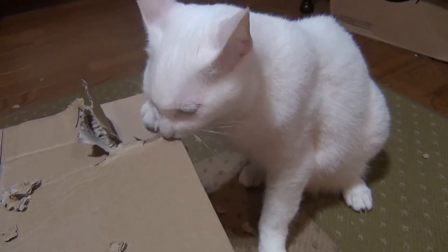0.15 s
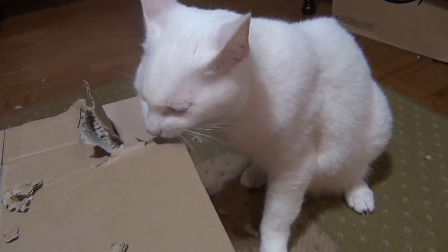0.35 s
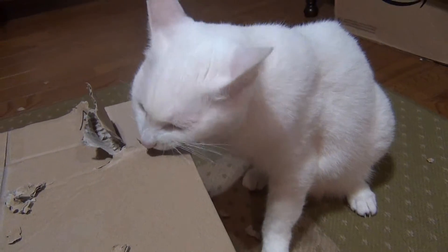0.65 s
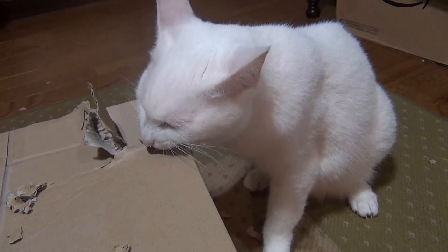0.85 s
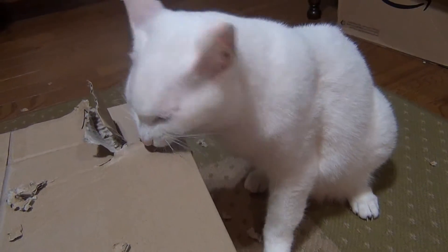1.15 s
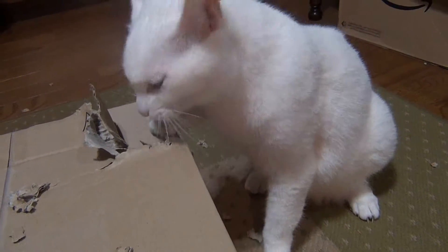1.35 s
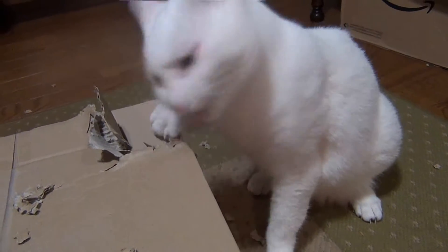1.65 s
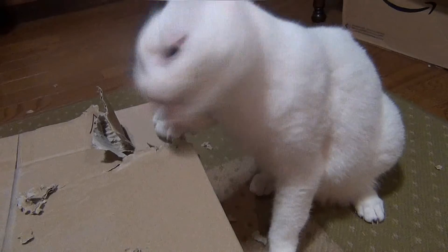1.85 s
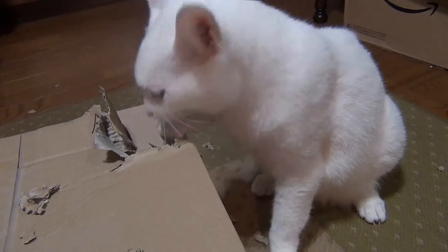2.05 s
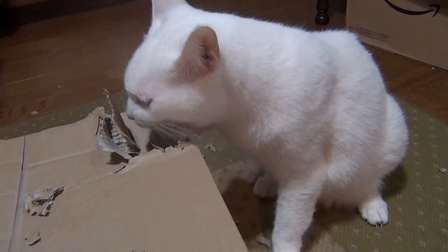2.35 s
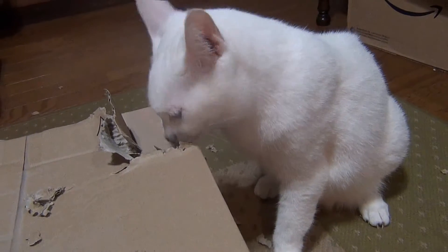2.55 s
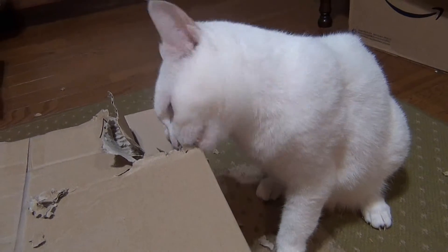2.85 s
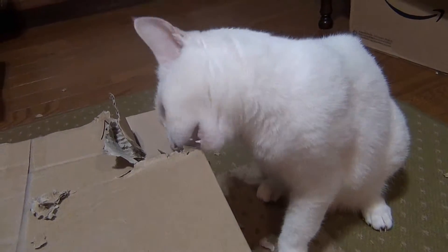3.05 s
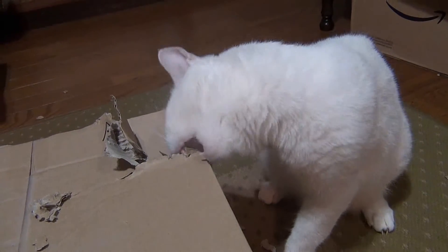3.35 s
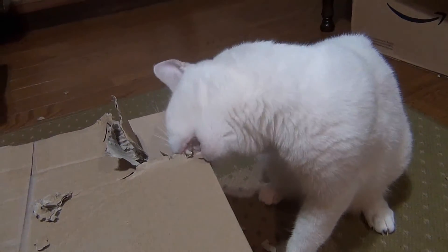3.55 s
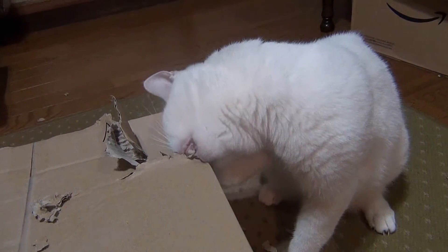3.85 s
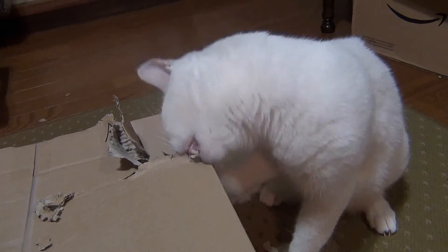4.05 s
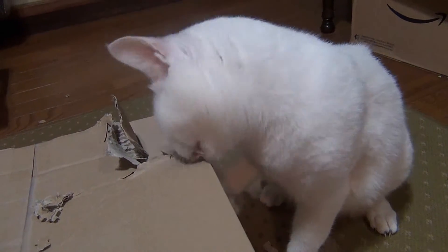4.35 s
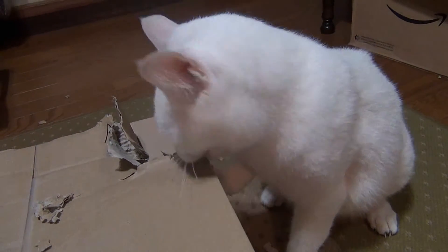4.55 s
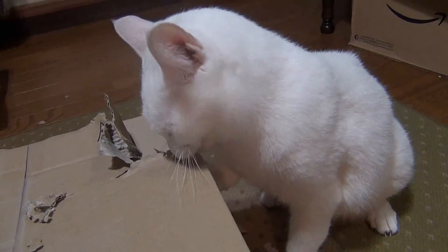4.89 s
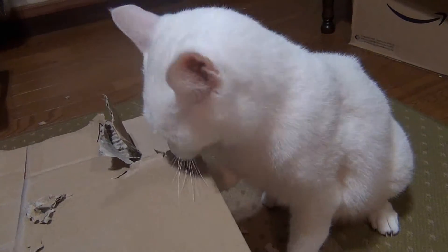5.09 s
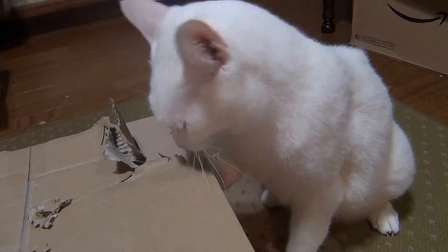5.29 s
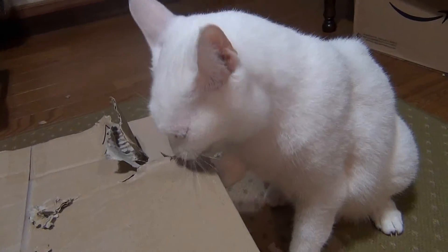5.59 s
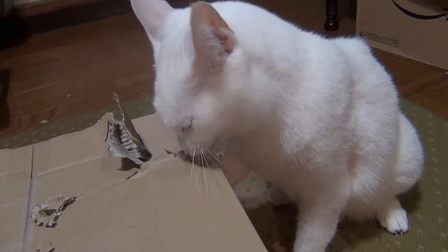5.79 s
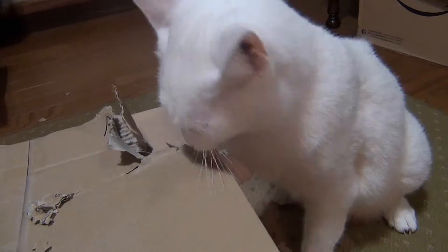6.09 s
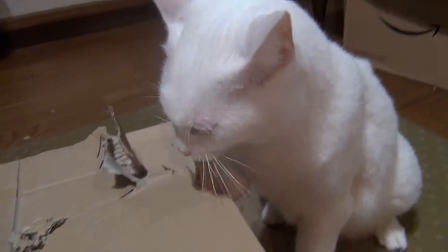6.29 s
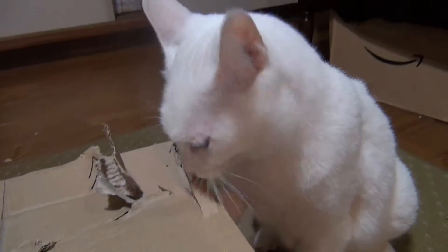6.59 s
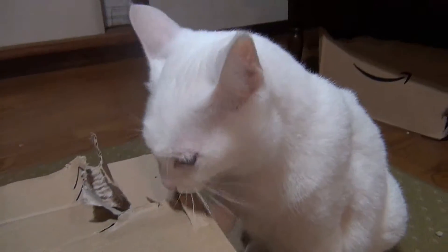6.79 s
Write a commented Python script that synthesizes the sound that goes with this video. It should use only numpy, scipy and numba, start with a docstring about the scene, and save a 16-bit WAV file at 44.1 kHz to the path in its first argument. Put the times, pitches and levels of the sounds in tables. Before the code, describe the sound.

Quiet room air and faint wet-gritty nibbling, then teeth bite into stiff cardboard: sharp pops, a hard tearing burst and a low box knock. Near silence with tiny rubs follows. A longer bout of dry crackling and snapping ends in a loud rip; isolated clicks, then one last abrupt tear. Close stereo pickup, short indoor reverberation.

```python
"""Faint room air, then soft gritty rubs: a cat chews, close by, at the edge of a corrugated cardboard box.
Its bites crackle and snap: random tiny fractures excite resonances of the panels, the sheet and the fibres.
At hard tugs torn flaps ring as decaying sines, and jolts set the modes of box and room ringing.
Rubs are noise bursts through mouth resonances; echoes, a decaying-noise tail and two microphones complete it."""
import sys
import numpy as np
from scipy import signal
from scipy.fft import rfft, irfft
from scipy.io import wavfile
from scipy.ndimage import uniform_filter1d
from numba import njit

SR = 44100
rng = np.random.default_rng(int(sys.argv[2]) if len(sys.argv) > 2 else 0)


def wav_out(sig):
    """Save sig, one row per channel (or a flat mono array), as 16-bit PCM at SR to the path in sys.argv[1]."""
    wavfile.write(sys.argv[1], SR, np.round(np.clip(np.atleast_2d(sig).T, -1, 1) * 32767).astype(np.int16))


N = 305613
T = np.arange(N) / SR   # time in s


def from_db(db):
    """Logarithmic level: every 20 dB is a factor of ten in amplitude."""
    return 10 ** (np.asarray(db) / 20)


def rms_one(x):
    """Normalization: the root of the mean square becomes 1."""
    return x / np.sqrt(np.mean(x ** 2) + 1e-20)


def resonate(x, hz, width_hz):
    """Linear resonance: a pole pair passes its centre pitch with gain 1; its radius sets the bandwidth."""
    r = np.exp(-np.pi * width_hz / SR)
    numerator = np.array([1, 0, -1]) * (1 - r * r) / 2
    denominator = [1, -2 * r * np.cos(2 * np.pi * hz / SR), r * r]
    return signal.lfilter(numerator, denominator, x + 1e-18)


@njit
def glide(x, hz, width_hz, rate):
    """Time-varying resonance: the pole angle follows a moving centre pitch at constant bandwidth."""
    r = np.exp(-np.pi * width_hz / rate)
    y = np.zeros(len(x))
    for i in range(2, len(x)):
        drive = (1 - r * r) / 2 * (x[i] - x[i - 2])
        feedback = 2 * r * np.cos(2 * np.pi * hz[i] / rate) * y[i - 1] - r * r * y[i - 2]
        y[i] = drive + feedback + 1e-18
    return y


def width_of(t60):
    """Damping and bandwidth: a mode that falls 60 dB in t60 seconds has this width in Hz."""
    return np.log(1000) / np.pi / t60


def favour(modes, favoured_hz, db_per_octave):
    """Selective excitation: modes answer less the more octaves they lie from the favoured pitch."""
    return [(hz, from_db(db - db_per_octave * abs(np.log2(hz / favoured_hz)))) for hz, db in modes]


def add(power, at, db, rise, fall):
    """Exponential swell: power climbs 20 dB over the rise and sinks 20 dB over the fall."""
    near = slice(*np.searchsorted(T, [at - 4 * rise, at + 4 * fall]))
    distance = np.maximum((at - T[near]) / rise, (T[near] - at) / fall)
    power[near] += from_db(db - 20 * distance) ** 2


# spectrum of the room air: pitch_hz, relative_level_db (per Hz)
AIR_SPECTRUM = [(25, -23), (60, -22.5), (90, -17), (125, 4), (170, -8), (330, -12.5), (600, -9.5),
                (900, -8.5), (1080, -21.5), (1300, -15), (1900, -25), (4000, -28), (10500, -30)]
AIR_DB = -67   # rms of the part common to both sides


def background(side_db=-7.5):
    """Stationary noise: random air sound shaped in spectrum, partly opposite in phase at the two sides."""
    hz, db = np.transpose(AIR_SPECTRUM)
    log_hz = np.log(np.fft.rfftfreq(N, 1 / SR) + 1)
    colour = from_db(np.interp(log_hz, np.log(hz), db))
    mid, side = rms_one(irfft(rfft(rng.standard_normal((2, N))) * colour, N))
    return from_db(AIR_DB) * (mid + from_db(side_db) * side * np.array([[1], [-1]]))


# resonances of a scrap of card in the open mouth: pitch_hz, level_db
MOUTH_MODES = [(290, 1.5), (690, 3), (990, 0.5), (1350, 1.5), (2380, 2), (2870, -6.5), (3600, -6)]
MOUTH_FOCUS_DB_PER_OCTAVE = 13.5
# teeth and tongue rub the card or a scrap in the mouth: start_s, level_db, length_s, favoured_pitch_hz
NIBBLES = [(0.289, -63.5, 0.098, 1340), (0.445, -56.5, 0.044, 1870), (0.463, -51.5, 0.033, 1120),
           (0.579, -67, 0.028, 1860), (0.615, -62, 0.0196, 1770), (.741, -53.5, .012, 1250),
           (0.754, -54, 0.019, 1390), (0.964, -45.5, 0.014, 1760), (1.019, -37.5, 0.011, 2000),
           (1.208, -41, 0.019, 1780), (1.255, -40.5, 0.022, 1370), (1.443, -45, .013, 2860),
           (1.709, -58, 0.006, 2454), (1.841, -49, .032, 396), (1.95, -52.5, 0.035, 330),
           (2.026, -55, 0.022, 750), (2.073, -52.5, .021, 417), (2.172, -64.5, .055, 705),
           (2.59, -64, 0.014, 1200), (2.839, -65, 0.019, 1096), (3.403, -56, 0.047, 800),
           (3.496, -46.5, 0.025, 1836), (4.124, -48.5, 0.053, 1140), (5.861, -57.5, 0.015, 850),
           (6.241, -31, 0.054, 3640)]


def nibbles():
    """Source and filter: short gritty friction is coloured by the resonances of card and open mouth."""
    out, age = np.zeros(N + SR), T[:SR // 4]
    grits = rng.standard_normal((len(NIBBLES), len(age)))
    for (s, db, length, favoured_hz), grit in zip(NIBBLES, grits):
        rise = length / 4
        force = grit * np.abs(grit) * age / rise * np.exp(-age / rise)
        modes = favour(MOUTH_MODES, favoured_hz, MOUTH_FOCUS_DB_PER_OCTAVE)
        rub = sum((-1) ** k * gain * resonate(force, hz, 35 + .06 * hz)
                  for k, (hz, gain) in enumerate(modes))
        loudness = np.sqrt(np.sum(rub ** 2) / (2 * rise * SR))
        i = round((s - rise / 2) * SR)
        out[i:i + len(age)] += from_db(db) * rub / loudness
    return out[:N]


# box panels: pitch_hz, level_db, t60_s (free ringing)
BOX_MODES = [(52.38, -8.5, .14), (95.62, -8, 0.12), (151.3, -10.5, 0.1), (222, -4, 0.18),
             (295.6, -6.5, 0.19), (371.6, -10.5, .07), (539, -10, 0.1)]
# standing waves between floor and ceiling: pitch_hz, level_db (after a jolt), t60_s
ROOM_MODES = [(58.96, -28.5, 1.6), (136, -30, 0.92), (176, -24, .63), (237, -15, 0.47), (303, -21, 0.43),
              (350, -22, 0.33), (412, -39.5, 0.2), (590, -36, 0.13)]
# the whole box jolts: start_s, level_db, rocking_db (extra below 100 Hz as it rocks on the floor)
THUMPS = [(0.755, -54, 1), (1.087, -27, -2.5), (1.399, -11.5, 1.5), (3.293, -54.5, 14.5),
          (3.903, -41.5, -1.5), (4.33, -35.5, -4), (4.545, -53, 8.5), (5.255, -26, -1.5),
          (5.723, -48.5, -1.5), (6.259, -23, -2.5)]


def thumps(modes):
    """Modal superposition: each jolt starts a sum of exponentially decaying sines."""
    out, age = np.zeros(N + 2 * SR), T[:2 * SR]
    rings = np.array([(-1) ** k * from_db(db - 60 * age / t60) * np.sin(2 * np.pi * hz * age)
                      for k, (hz, db, t60) in enumerate(modes)])
    deep = np.array(modes)[:, 0] < 100
    for s, db, rock_db in THUMPS:
        i = round(s * SR)
        out[i:i + len(age)] += from_db(db + rock_db * deep) @ rings
    return out[:N]


# the jaw holds the card and it crackles steadily: start_s, end_s, sheet_level_db, fibre_share_db
GRIPS = [(0.992, 1.134, -54.5, -4.5), (1.194, 1.415, -60.5, 6), (1.502, 2.097, -69, -13.5),
         (2.85, 3.4, -77, -3), (3.421, 3.8, -64.5, -5), (3.85, 4.614, -58.5, -1), (4.66, 5.246, -63, 1.5),
         (5.4, 6.93, -73, 0)]
GRIP_ATTACK_DB_PER_S, GRIP_RELEASE_DB_PER_S, GRIP_BOX_DB = 298.5, 151, 2.5


def grip():
    """Sustained forcing: crackle power in sheet and fibres as the jaw closes, holds and lets go."""
    sheet, fibre = 0, 0
    for start, end, db, fibre_db in GRIPS:
        closing_db = (start - T) * GRIP_ATTACK_DB_PER_S
        opening_db = (T - end) * GRIP_RELEASE_DB_PER_S
        slack_db = np.clip(np.maximum(closing_db, opening_db), 0, 80)
        held = from_db(db - slack_db) ** 2
        sheet, fibre = sheet + held, fibre + held * from_db(fibre_db) ** 2
    return sheet, fibre


def fractures(per_s, spread_db, clump_db):
    """Random point process: tiny breaks of uneven size bunch over milliseconds, their local power evened."""
    sizes = from_db(spread_db * np.minimum(rng.exponential(1, N), 4)) * rng.choice([-1, 1], N)
    clicks = sizes * (rng.random(N) < per_s / SR)
    clumps = rms_one(uniform_filter1d(rng.standard_normal(N), size=130))
    clicks = clicks * from_db(clump_db * clumps)
    local_power = np.abs(uniform_filter1d(clicks ** 2, size=1500))
    return clicks / np.sqrt(local_power + 1e-6)


# tugs that tear or crush the card: start_s (at the height), sheet_level_db, fall_s, fibre_share_db, box_share_db
TUGS = [(1.028, -48, 0.035, 8, -6), (1.0858, -24, 0.0068, -3.5, -12.5), (1.242, -38.5, 0.041, 8, -6),
        (1.285, -51, 0.054, 5, -15), (1.376, -24, 0.028, 0, 5), (1.391, -28.5, 0.031, -10, 9.5),
        (3.295, -46.5, 0.028, -7, -14), (3.512, -43.5, 0.035, -1.5, -7.5), (3.777, -51, 0.014, 3, 10.5),
        (3.82, -49.5, 0.074, -7.5, 3.5), (3.904, -32.5, .018, 3.5, 1.5), (3.944, -40.5, 0.067, -11, 3.5),
        (3.989, -47, 0.05, 11, -17), (4.031, -38, 0.024, 2.5, -4.5), (4.242, -45.5, 0.017, 2, 2),
        (4.339, -46.5, 0.036, 7.5, 1.5), (4.426, -42, 0.086, 5.5, -20), (4.529, -42, 0.011, 5, 6),
        (4.895, -39.5, 0.03, 4.5, -33), (4.964, -40, 0.0096, -0.5, -16), (5.235, -24.5, 0.034, 2, -1),
        (5.256, -30.5, 0.037, -21, -3), (6.242, -19, .03, 2.5, -8.5), (6.263, -29, 0.033, 2.5, -2)]
# in fall times: a tug builds faster than it lets go, and the fibres part first
TUG_RISE_SHARE, FIBRE_LEAD_SHARE = 0.8, .08
# in fall times: the heavy box follows late and settles slowly
BOX_LAG_SHARE, BOX_STRETCH = 0.25, 2
# the card strains faintly before a tug and settles after it; stretches in fall times
STRAIN_DB, STRAIN_STRETCH, SETTLE_STRETCH = -23.5, 3.2, 2.0
# each rub also stirs the fibres and the box; stretch in rub lengths
NIBBLE_FIBRE_DB, NIBBLE_BOX_DB, NIBBLE_STRETCH = -14.5, -12, 2


def tearing(sliding_db=-10.0):
    """Fracture under load: breaking fibres drive the box, the sheet and the fibres around them."""
    sheet, fibre = grip()
    box = sheet * from_db(GRIP_BOX_DB) ** 2
    for at, db, fall, fibre_db, box_db in TUGS:
        rise = TUG_RISE_SHARE * fall
        add(box, at + BOX_LAG_SHARE * fall, db + box_db, rise, BOX_STRETCH * fall)
        fibre_at = at - FIBRE_LEAD_SHARE * fall
        for part, height, level_db in ((sheet, at, db), (fibre, fibre_at, db + fibre_db)):
            add(part, height, level_db, rise, fall)
            add(part, height, level_db + STRAIN_DB, STRAIN_STRETCH * fall, SETTLE_STRETCH * fall)
    for at, db, length, _ in NIBBLES:
        for part, share_db in ((box, NIBBLE_BOX_DB), (fibre, NIBBLE_FIBRE_DB)):
            add(part, at, db + share_db, length, NIBBLE_STRETCH * length)
    # a gentle pull breaks fibres one by one, a hard rip breaks them in a rush
    per_s = 900 + 24000 * np.sqrt(sheet + fibre)
    breaks = fractures(per_s, spread_db=4.0, clump_db=3.0)
    sliding = from_db(sliding_db) * rng.standard_normal(N)   # paper sliding on paper
    return (breaks + sliding) * np.sqrt([box, sheet, fibre])


STRAY_SNAP_DB, STRAY_SPREAD_DB = 25.5, 1   # peak above the fibre crackle of the grip, and its random spread


def stray_snaps(count=70, sheet_db=-5.5):
    """Random failure: thin bundles snap at chance moments, as hard as the jaw grips; rows as in SNAPS."""
    at = rng.uniform(.1, T[-1] - .1, count)
    grip_db = 10 * np.log10(np.interp(at, T, grip()[1]))
    levels_db = grip_db + STRAY_SPREAD_DB * rng.standard_normal(count)
    return [(s, db + STRAY_SNAP_DB, sheet_db) for s, db in zip(at, levels_db)]


# thick fibre bundles snapping: start_s (of the break), peak_level_db, sheet_share_db
SNAPS = [(1.021, -27.5, 12), (1.097, -13, -7), (1.136, -14.5, -5), (1.173, -21, -5.5), (1.211, -21, 5.5),
         (1.3595, -3, -16), (1.370, -6, 2), (1.389, -11, 7.5), (1.715, -39.5, -4), (3.292, -36.5, 6),
         (3.56, -21, -5), (3.86, -20, -5), (3.9765, -15, -20), (4.017, -21, -7), (4.058, -15, -6.5),
         (4.139, -31.5, 14), (4.16, -14, -6.5), (4.3167, -15, -11), (4.402, -14.5, -11), (4.412, -19, -6),
         (4.425, -7.5, -28), (4.48, -20, -22), (4.612, -27.5, 0), (4.675, -14.5, -2.5), (4.743, -5, -11.5),
         (4.815, -26.5, -6.5), (4.921, -14, -8.5), (4.94, -22, -6.5), (5.14, -9.5, -5),
         (5.1635, -13, -11.5), (5.2027, -25, -13), (5.524, -36, 7.5), (5.719, -10.5, -6), (6.047, -27, -14),
         (6.647, -51.5, 20.5)]


def snaps(crumble_db=-19.0, crumble_t60=0.015, strain_s=.008):
    """Impulsive release: small breaks gather, the bundle gives way in a click, and the rest crumbles."""
    sheet, fibre = np.zeros(N), np.zeros(N)
    lead = SR // 100   # samples of strain before the click
    age = T[:SR // 20] - T[lead]
    crumble = from_db(crumble_db - 60 * np.maximum(age / crumble_t60, -age / strain_s))
    bundles = stray_snaps() + list(SNAPS)
    all_crumbs = rng.standard_normal((len(bundles), len(age)))
    for (s, db, sheet_db), crumbs in zip(bundles, all_crumbs):
        force = crumble * crumbs * np.abs(crumbs) / 2
        force[lead] = 1
        i = round(s * SR) - lead
        sheet[i:i + len(age)] += from_db(db + sheet_db) * force
        fibre[i:i + len(age)] += from_db(db) * force
    return sheet, fibre


def body(force, modes, scatter_db, colour_db, wander=.04):
    """Varying modal coupling: strength scatters every 32 samples; pitch and colour shift as the card bends."""
    out, power = 0, 0
    bends = np.arange(0, T[-1] + .1, .04)   # moments in s
    for k, (hz, width, db) in enumerate(modes):
        per_click = from_db(scatter_db * np.clip(rng.standard_normal(N // 32 + 1), -1.5, 1.5))
        per_bend = from_db(colour_db * rng.uniform(-1, 1, len(bends)))
        click_strength = np.repeat(rms_one(per_click), 32)[:N]
        strength = click_strength * np.interp(T, bends, rms_one(per_bend))
        pitch = np.interp(T, bends, hz * np.exp(wander * rng.standard_normal(len(bends))))
        ringing = glide(force * strength, pitch, float(width), float(SR))
        out = out + (-1) ** k * from_db(db) * ringing
        power += from_db(db) ** 2 * np.pi * width / SR
    return out / np.sqrt(power)


# resonances of the bitten sheet: pitch_hz, width_hz, level_db
SHEET = [(480, 120, -7), (643, 54, 5), (913.2, 580, -3), (1383, 130, 2.5), (1753, 110, -5), (2590, 280, -3),
         (2860, 130, -10), (3728, 250, -10)]
# resonances of its fibres: pitch_hz, width_hz, level_db
FIBRE = [(2350, 780, -9.5), (3500, 230, -13.5), (4500, 700, -8.5), (5187, 1800, -9), (6600, 1200, -5),
         (7300, 1400, -7), (9285, 1300, 1.5), (8963, 1200, -2), (10315, 440, -0.5)]
PANEL_TILT_DB_PER_OCTAVE = -0.85   # tiny breaks drive the panel modes with a tilted balance


def cardboard():
    """Forced vibration: tearing and snapping sound through the panels, the bitten sheet and the fibres."""
    # the jaw damps the panels, which doubles their bandwidth
    panels = [(hz, width_of(t60) * 2, db + PANEL_TILT_DB_PER_OCTAVE * np.log2(hz))
              for hz, db, t60 in BOX_MODES]
    torn = sum(body(force, modes, scatter_db=5.0, colour_db=3.5)
               for force, modes in zip(tearing(), (panels, SHEET, FIBRE)))
    snapped = sum(body(force, modes, scatter_db=1.5, colour_db=2.5)
                  for force, modes in zip(snaps(), (SHEET, FIBRE)))
    return torn + snapped


# ringing of a torn flap: pitch_hz, level_db
FLAP_MODES = [(213.4, 2), (582, 2), (690, 2), (1110, -2), (1370, 0), (2287, -3.5)]
FLAP_RING_CYCLES, FLAP_FOCUS_DB_PER_OCTAVE = 27, 17.5   # cycles to fall 60 dB
# a flap slips off the teeth and swings, the shorter the higher:
# start_s, level_db, favoured_pitch_hz, build_up_s
FLAPS = [(1.0848, -6.5, 2272, .0004), (1.221, -33.5, 228.5, 0.0063), (1.3705, -14.5, 1370, 0.0025),
         (1.389, -15, 669, 0.0008), (1.3969, -9, 214, 0.014), (3.168, -49, 690, 0.011),
         (5.2425, -8, 1119, .0047), (5.718, -34.5, 889, .001), (6.232, -10.5, 1085, 0.00078),
         (6.258, -21.5, 210, .003), (6.646, -37.5, 742, 0.0038)]


def flaps(rough=0.35):
    """Damped free vibration: a released flap decays over a set number of cycles, its torn edge rubbing."""
    out, age = np.zeros(N + SR), T[:SR // 3]
    chances = rng.standard_normal((len(FLAPS), len(age)))
    for (s, db, favoured_hz, build), chance in zip(FLAPS, chances):
        i = round(s * SR)
        for hz, gain in favour(FLAP_MODES, favoured_hz, FLAP_FOCUS_DB_PER_OCTAVE):
            rub = 1 + rough * rms_one(uniform_filter1d(chance, size=int(SR / hz)))
            decay = from_db(-60 * np.maximum(age - build, 0) * hz / FLAP_RING_CYCLES)
            swing = np.minimum(age / build, 1) * decay
            out[i:i + len(age)] += from_db(db) * gain * swing * rub * np.sin(2 * np.pi * hz * age)
    return out[:N]


# early reflections from box top, floor and furniture: delay_s, left_level_db, right_level_db
ECHOES = [(.0009, -14, -19), (.0027, -21.5, -38), (.0046, -24, -21.5), (.0078, -26, -30.5)]


def echoes(x):
    """Specular reflection: nearby surfaces return a few quick, weaker copies."""
    return sum(from_db(np.array([[left], [right]])) * np.interp(T - delay, T, x, left=0)
               for delay, left, right in ECHOES)


def room(x):
    """Diffuse reverberation: convolution with decaying noise, different at each side, shorter in the treble."""
    low_t60, high_t60, split_hz = .23, .17, 1500   # s, s, Hz
    age = T[:SR // 3]
    noise = rng.standard_normal((2, len(age)))
    low = signal.sosfilt(signal.butter(2, split_hz, fs=SR, output="sos"), noise)
    high = signal.sosfilt(signal.butter(2, split_hz, "high", fs=SR, output="sos"), noise)
    tail = low * from_db(-60 * age / low_t60) - high * from_db(-60 * age / high_t60)
    tail = tail * (age > .003)
    return signal.oaconvolve(x[None], rms_one(tail) / np.sqrt(len(age)), axes=1)[:, :N]


def scene():
    """Superposition: close mouth and box add to the room's echoes, tail, standing waves and air."""
    teeth = cardboard() + nibbles()
    box = flaps() + thumps(BOX_MODES)
    near = teeth + box
    far = room(from_db(-11.0) * teeth + from_db(-19.5) * box)
    standing = thumps(ROOM_MODES) * from_db(np.array([[-1], [1]]))   # stronger at the right
    return near + echoes(near) + far + standing + background()


# lean of the sound by pitch: pitch_hz, left_minus_right_db
LEAN = [(60, -.8), (130, -1.8), (250, -1), (600, .4), (1200, .4), (2400, 2.2), (5000, 1.4), (9000, .3)]
# phase between the two microphones: pitch_hz, left_lead_rad
LEAD = [(50, 0.24), (220, -0.4), (700, 0.21), (2200, -0.9), (4400, 0.52), (6000, -0.17), (10500, 0.13)]
CUTOFF_HZ = 10500


def record(dry):
    """Stereo transduction: microphones differ in colour and phase; peaks saturate and the top is cut steeply."""
    log_hz = np.log(np.fft.rfftfreq(N, 1 / SR) + 1)
    lean_db, lead = [np.interp(log_hz, np.log(np.array(t)[:, 0]), np.array(t)[:, 1]) for t in (LEAN, LEAD)]
    half = np.array([[1], [-1]]) / 2   # each side takes half the difference
    x = irfft(rfft(dry) * from_db(lean_db * half) * np.exp(1j * lead * half), N)
    x = x / (1 + (x / .7) ** 6) ** (1 / 6)
    return signal.sosfilt(signal.ellip(12, .2, 70, CUTOFF_HZ, fs=SR, output="sos"), x)


dry = scene()
out = record(dry)
wav_out(out)
```